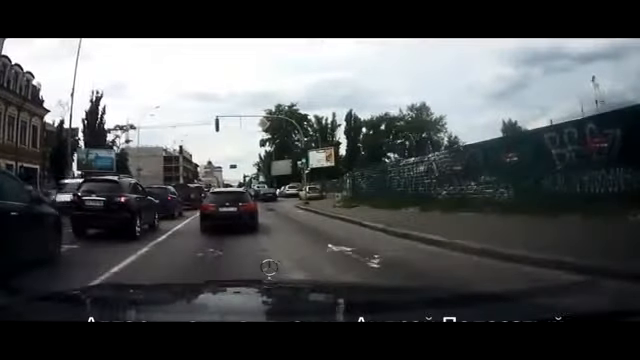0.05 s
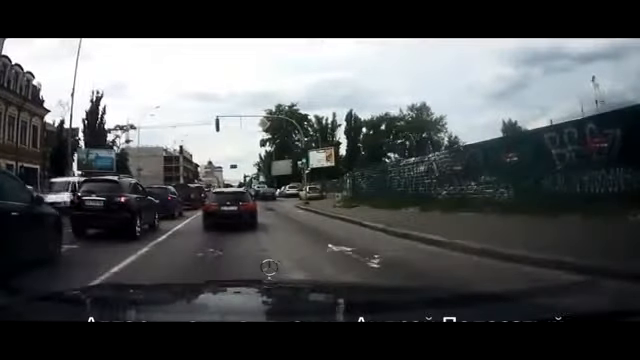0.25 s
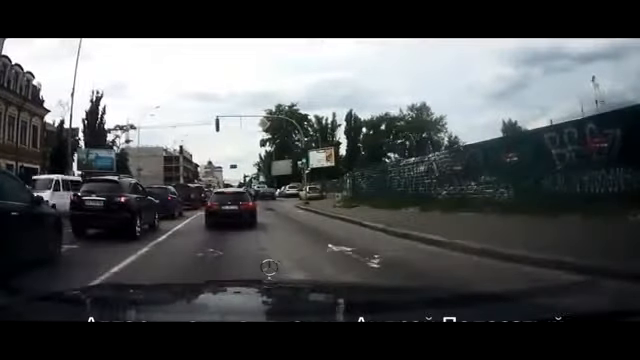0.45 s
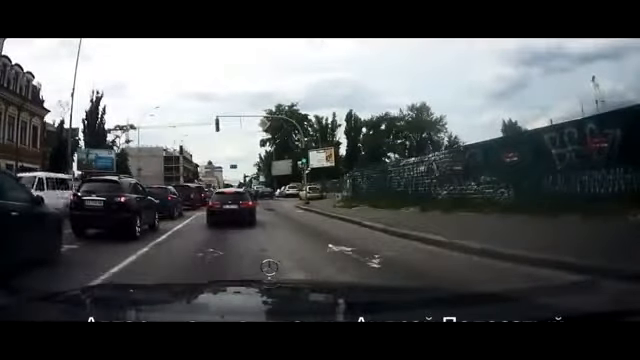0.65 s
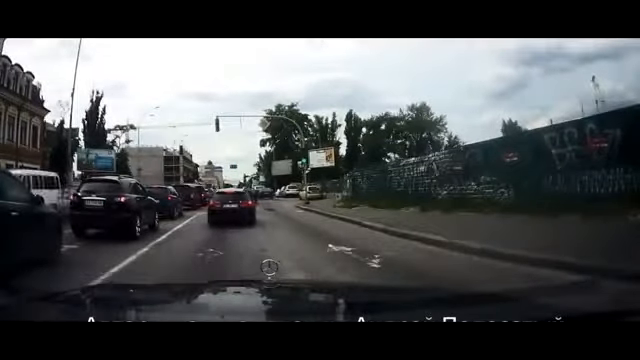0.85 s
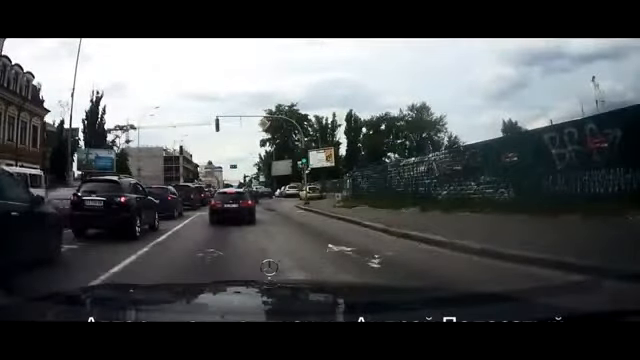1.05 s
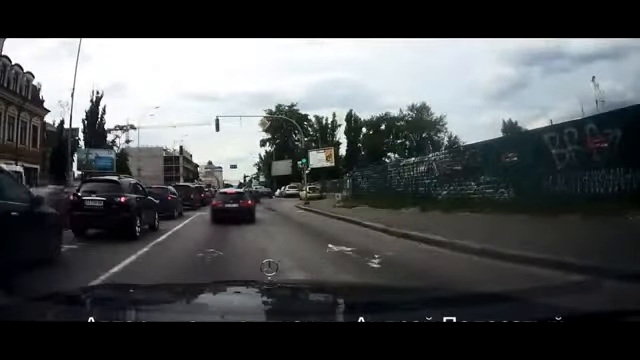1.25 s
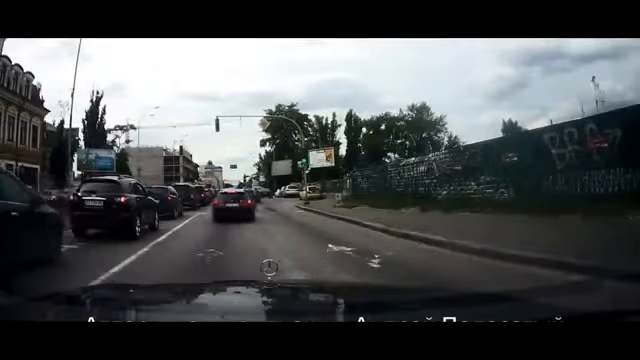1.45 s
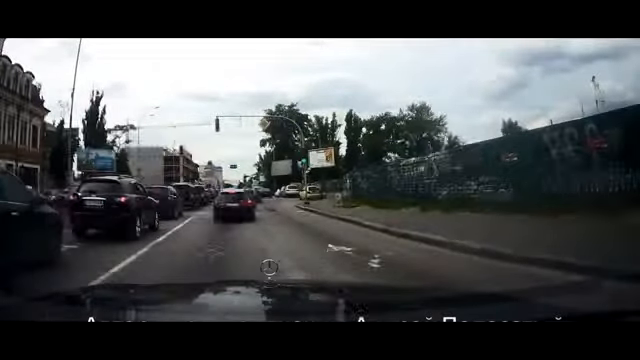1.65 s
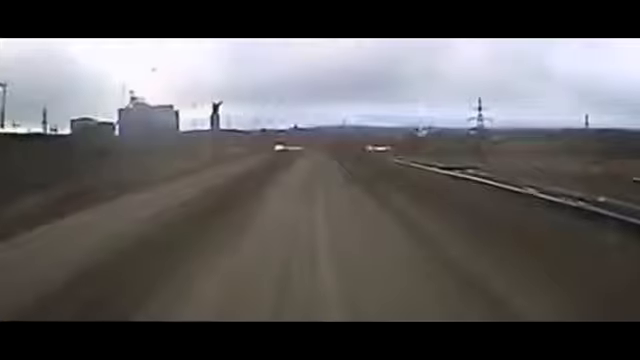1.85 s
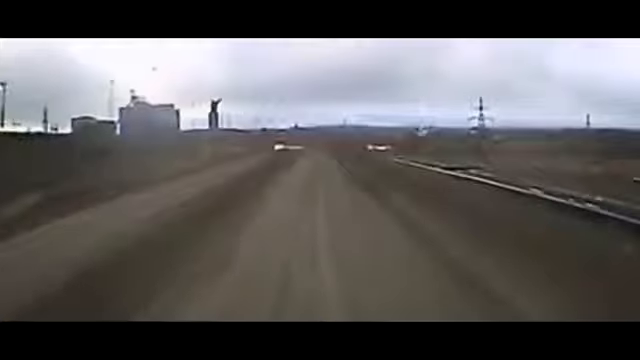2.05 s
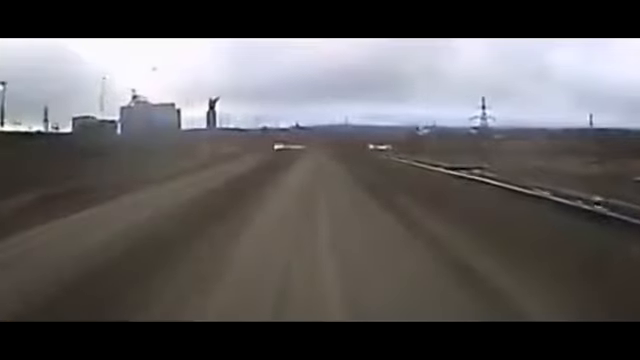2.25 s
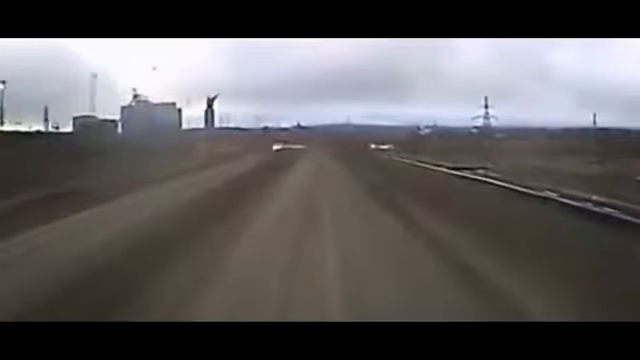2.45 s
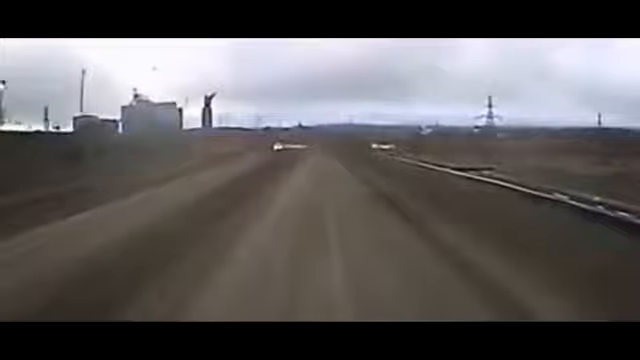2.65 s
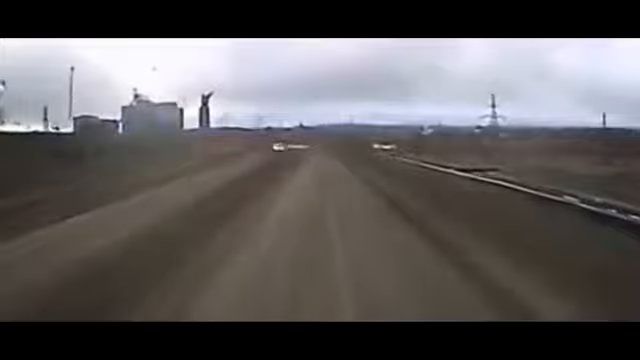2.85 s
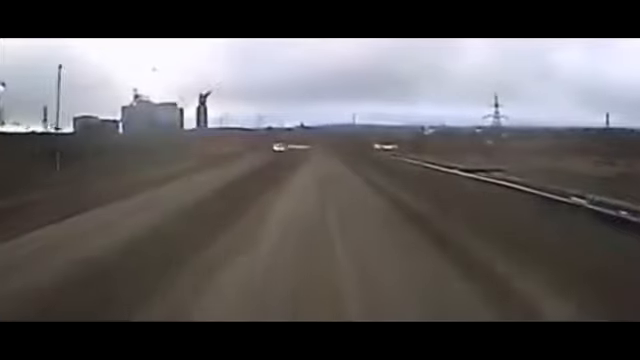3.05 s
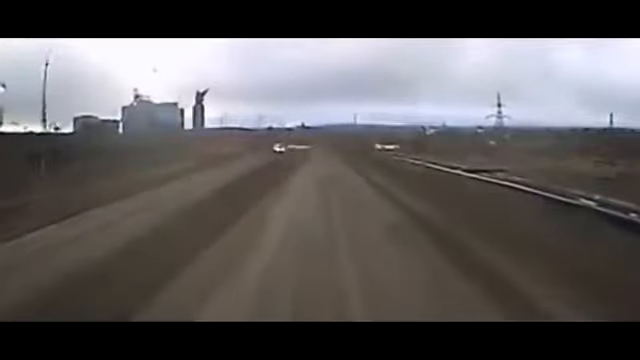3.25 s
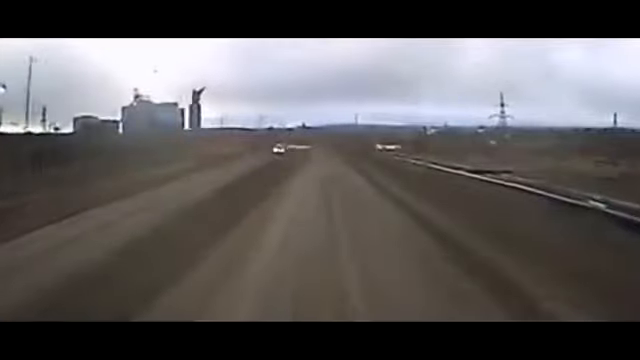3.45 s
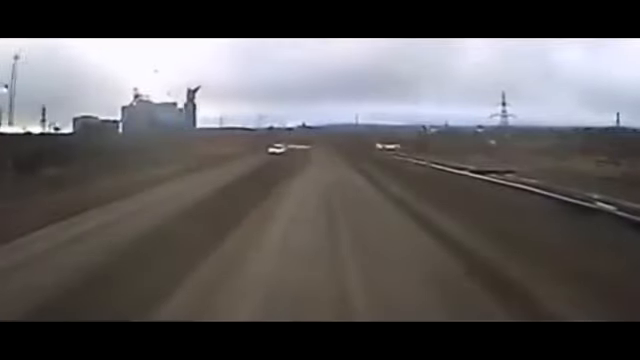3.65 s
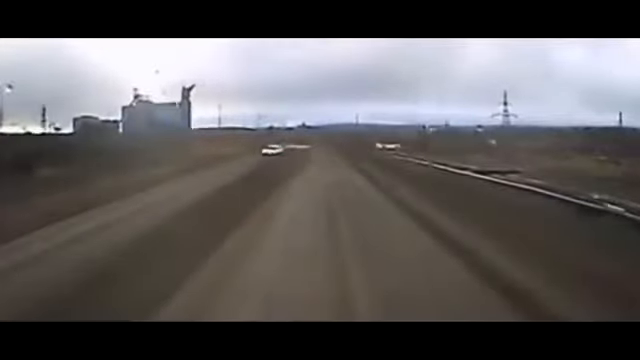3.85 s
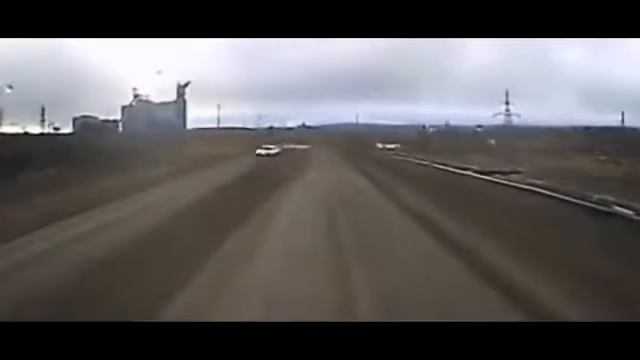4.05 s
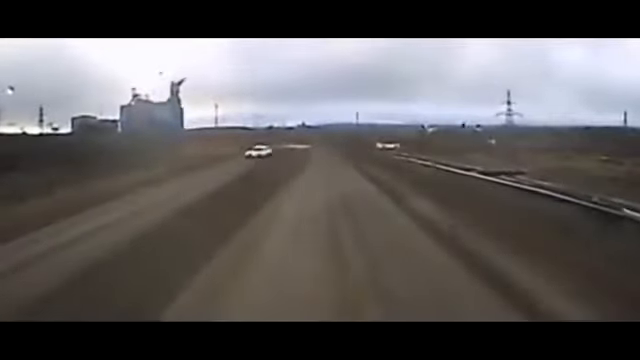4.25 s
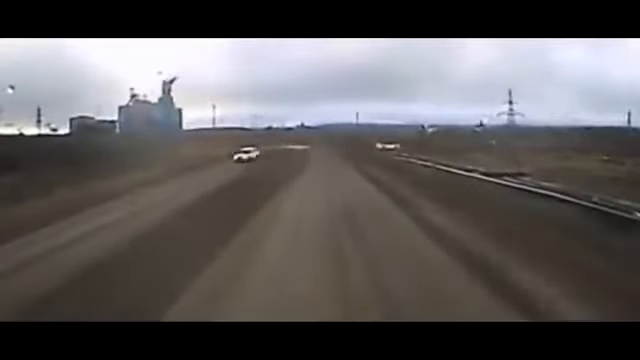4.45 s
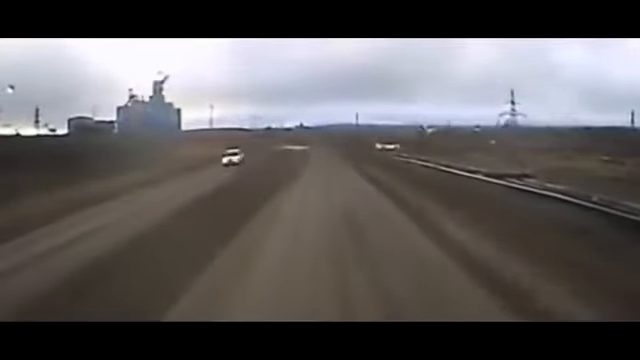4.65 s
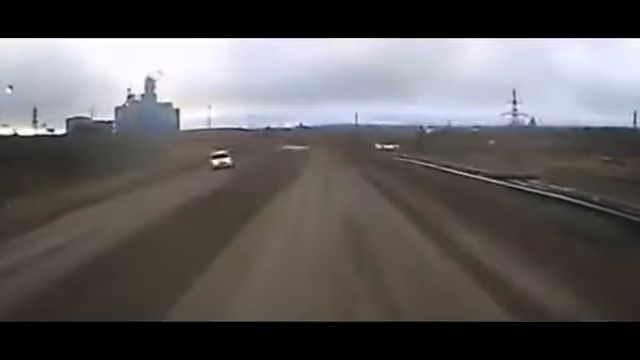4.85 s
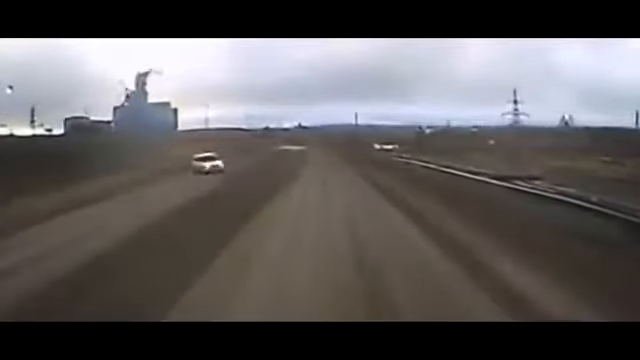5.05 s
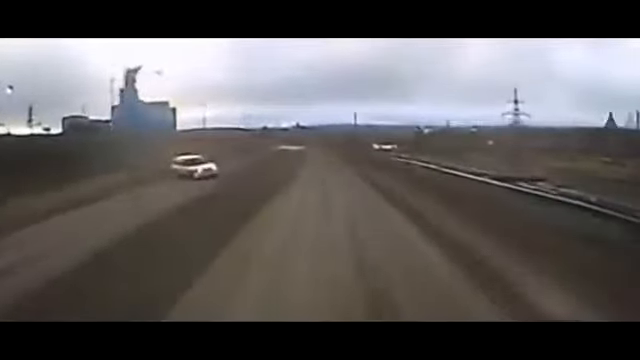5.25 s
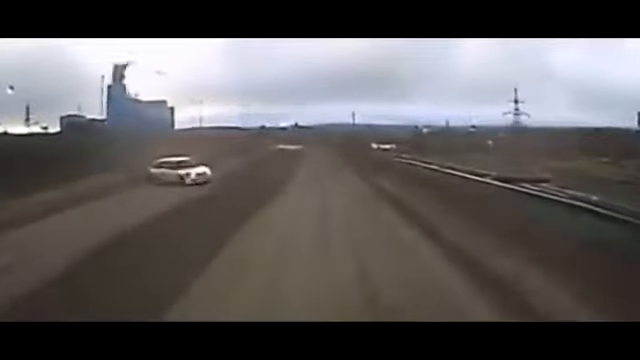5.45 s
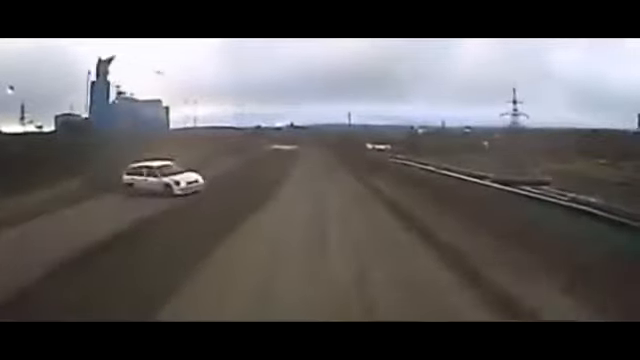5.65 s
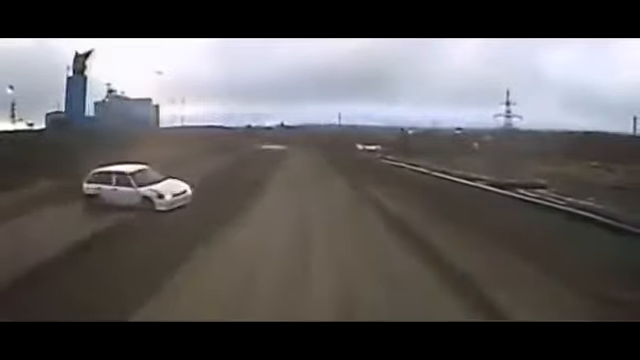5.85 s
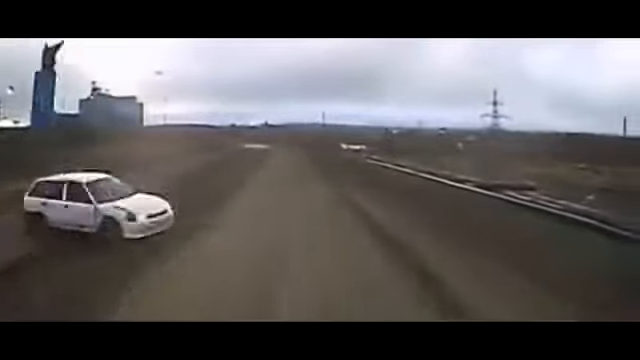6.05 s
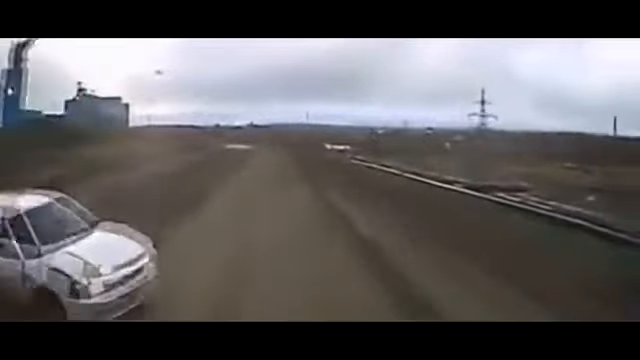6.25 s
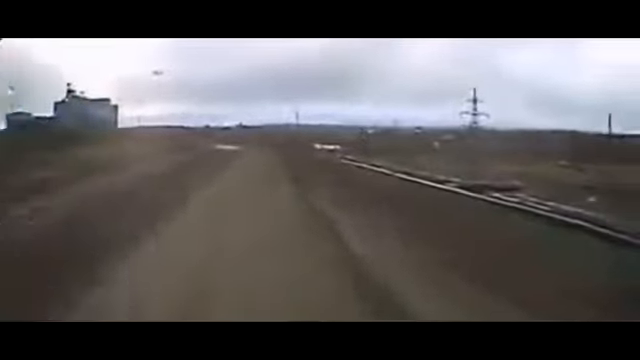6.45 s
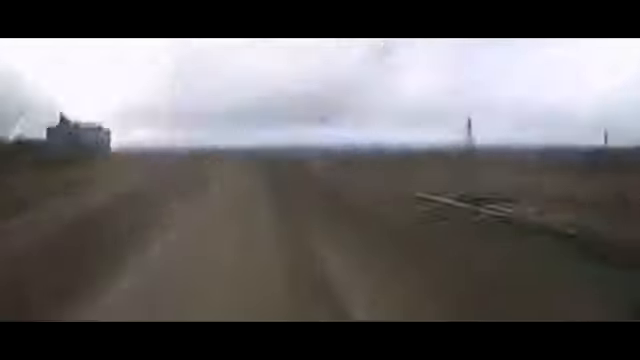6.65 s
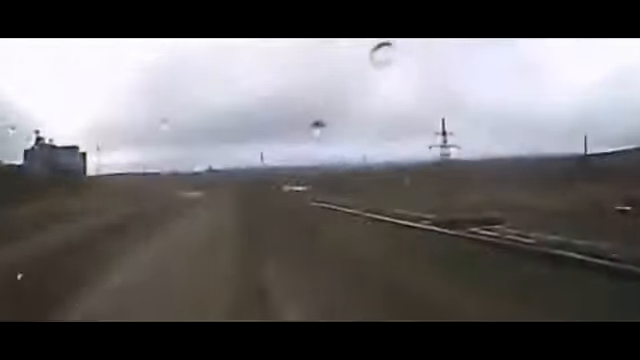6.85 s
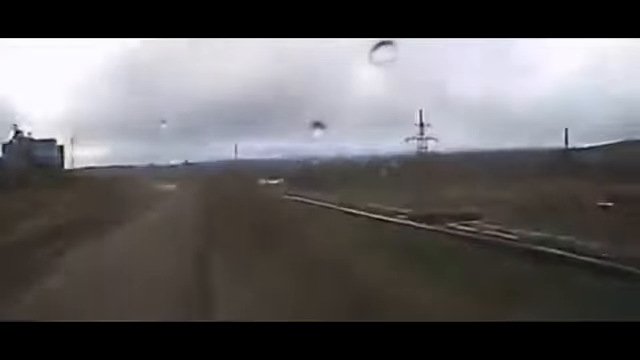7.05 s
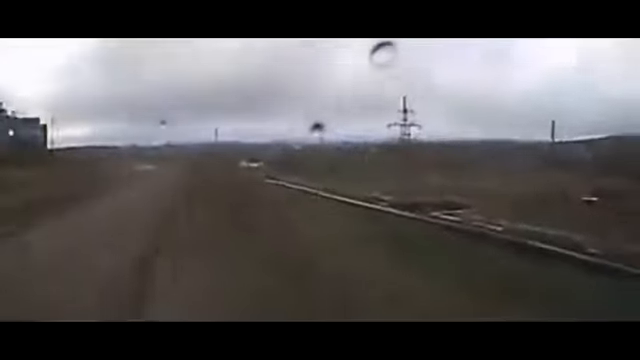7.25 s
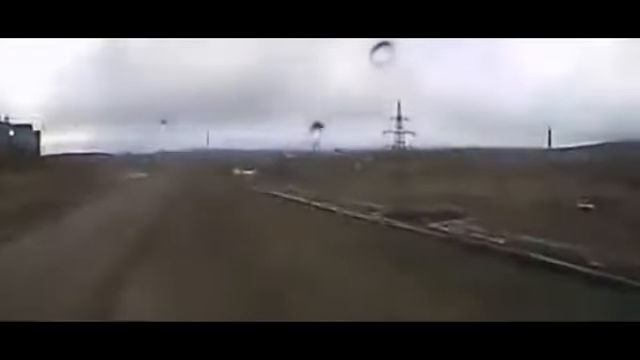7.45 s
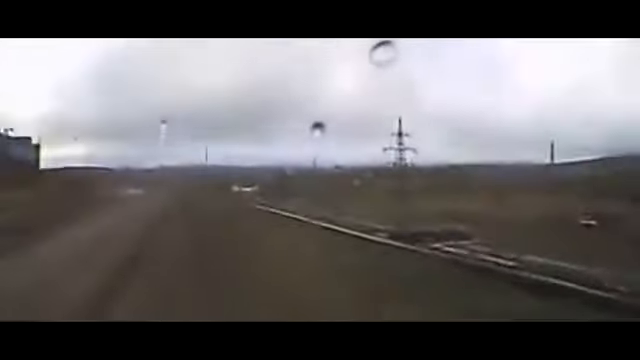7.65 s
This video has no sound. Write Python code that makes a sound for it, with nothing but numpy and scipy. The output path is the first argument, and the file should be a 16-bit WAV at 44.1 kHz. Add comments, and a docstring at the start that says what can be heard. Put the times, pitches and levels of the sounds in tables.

```python
"""A booming engine is heard first, from inside a car creeping through town: drifting tones over tyre noise.
Then a second car runs on a rough open road: tyre noise excites the cabin and a plastic mount chatters.
A crash follows: grains of crumpling metal, ringing panels and glass, then scraping, a squeal and grinding.
Impulses and noise drive resonators; friction is a wavering tone; a narrow-band microphone overloads."""
import sys
import numpy as np
from scipy import signal
from scipy.fft import rfft, irfft
from scipy.io import wavfile

SR = 44100
rng = np.random.default_rng(int(sys.argv[2]) if len(sys.argv) > 2 else 0)


def output_pcm(signal):
    """Save a mono or channel-first signal as 16-bit PCM at the path in sys.argv[1].

    Samples are clipped to [-1, 1] before scaling.
    """
    pcm = np.clip(np.atleast_2d(signal).T, -1, 1) * 32767
    wavfile.write(sys.argv[1], SR, np.round(pcm).astype(np.int16))


N = 339966
TIME = np.arange(N) / SR   # seconds

# blows on the body, from a pothole and from the crash:
# start_s, level_db, swell_ms, brightness_db_per_octave
BODY_BLOWS = [(5.13, -39, 22, 0), (6.141, -19, 4.3, 3), (6.168, -3.5, 6, -4), (6.19, -7, 5.1, -2.5),
              (6.216, -6, 8, 6), (6.243, -11, 8.5, 0), (6.276, -12, 4.9, -5), (6.348, -16, 7, -5),
              (6.405, -20, 17, 3.5), (6.831, -28, 5.1, 0), (6.935, -26, 16, 3.5), (7.621, -20.5, 13, -1)]
# resonances of the body panels: pitch_hz, width_hz, relative_level_db
PANEL_MODES = [(83, 60, -11.5), (239.5, 38, -5), (309.7, 21, 4.5), (462, 37, 2.5), (556, 30, 5),
               (723, 116, -4), (940, 125, -3), (1340, 530, -11.5)]
# spectrum of crumpling metal: frequency_hz, relative_density_db_per_hz
CRUSH_SPECTRUM = [(25, 9), (100, -4.5), (180, -2), (270, 4), (390, -1), (900, -2), (1800, 0), (2800, -6),
                  (4000, -5)]
# loose trim slapping against the car: start_s, level_db, swell_ms, brightness_db_per_octave
TRIM_SLAPS = [(6.622, -17, 2.8, 3), (6.755, -22.5, 19.7, -4), (6.829, -15, 3, 3), (6.841, -16.5, 6.5, -3.5),
              (6.858, -21, 8, -5), (6.891, -20.5, 4, -6), (7.01, -23, 11, -5), (7.074, -23, 3.3, 9),
              (7.127, -18, 3.9, 15), (7.141, -20.5, 4, 8), (7.2, -26, 6.5, -6), (7.297, -36, 4.6, -12),
              (7.5, -32.5, 13, -7), (7.622, -28, 13, -10)]
# resonances of the trim: pitch_hz, width_hz, relative_level_db
TRIM_MODES = [(1144, 435, 2.5), (1473, 130, 3), (1820, 145, 4), (2440, 380, -8.5)]
# plastic snaps as the body folds: start_s, relative_level_db
PLASTIC_SNAPS = [(6.312, 0), (6.362, -2), (6.387, 2), (6.516, -2), (6.843, -5)]
# spectrum of the wreck scraping along the road: frequency_hz, relative_density_db_per_hz
SCRAPE_SPECTRUM = [(35, -41), (60, -5), (500, -5), (1010, -4.5), (1820, -3.5), (3300, -19), (4000, -11.5)]
# knocks of the mount, from bumps and from the crash:
# start_s, relative_level_db, swell_ms, brightness_db_per_octave
MOUNT_KNOCKS = [(2.334, -28, 4.3, -1), (2.42, -31.5, 2.1, -3), (2.607, -25, 2.3, -1.5),
                (2.636, -24.5, 14.5, -3), (2.684, -24.5, 2.6, -1), (2.988, -28, 4.8, -2.5),
                (3.073, -29.5, 6, 3.5), (3.106, -24.5, 11.6, -2), (3.15, -23.5, 3.9, 0.5),
                (3.184, -28, 19, 1), (3.233, -25, 7.5, -2), (3.455, -25.5, 7, -1.5),
                (3.487, -25.5, 3.5, -0.5), (3.525, -27, 25, -2.5), (3.567, -23.5, 2.2, -0.5),
                (3.604, -26.5, 14.6, -3.5), (3.646, -26, 7.3, 0), (3.682, -25.5, 5, -1),
                (3.918, -35.5, 16, -4), (4.642, -33.5, 5.9, -2.5), (4.768, -25, 4.8, -1.5),
                (4.797, -31, 11, -2.5), (4.958, -27, 3.4, -1.5), (4.99, -29.5, 6.8, -2),
                (5.039, -26, 7.5, -1), (5.282, -26, 3.5, -1), (5.32, -28.5, 13.5, -2.5),
                (5.367, -25.5, 10.5, -0.5), (5.402, -32, 8.7, -2), (5.451, -30, 3.9, -1),
                (5.535, -30.5, 22, 0), (5.897, -28, 9.5, -2.5), (6.27, -8, 3.8, 2.5), (6.303, -9.5, 7.8, 1),
                (6.319, -12.5, 1.8, -1), (6.344, -4, 4, 2.5), (6.384, -10.5, 2.4, -2),
                (6.403, -10.5, 2.1, -5.5), (6.424, -17, 9.6, 5), (6.473, -14, 7.4, 3),
                (6.515, -17.5, 0.95, 1), (6.832, -24, 7.3, -3), (7.128, -25.5, 14.4, 1),
                (7.626, -23, 12.6, 2), (7.668, -28, 3.3, 0.5)]
# resonances of the plastic mount: pitch_hz, width_hz, relative_level_db
MOUNT_MODES = [(594, 460, -10.5), (1367, 270, -4.5), (1803, 69, 3.5), (1961, 104, 1), (2666, 390, -3.5),
               (3000, 200, -3), (3756, 380, -0.5)]
# short squeaks of rubbing parts: loudest_s, pitch_hz, level_db
RUBBING_SQUEAKS = [(2.094, 1380, -40), (4.38, 1386, -40.5), (6.56, 1084, -29), (6.968, 890, -25.5),
                   (7.047, 690, -28.5)]
# roughness of the open road, as the level of the mount's buzz: time_s, level_db
ROAD_ROUGHNESS = [(1.85, -47.5), (2.4, -47.5), (2.75, -45.5), (3.3, -42), (3.6, -46), (3.88, -49),
                  (4.55, -53.5), (4.9, -51.5), (5.2, -39.5), (5.55, -42), (6.1, -45)]
# spectrum of tyres on the open road: frequency_hz, relative_density_db_per_hz
ROAD_SPECTRUM = [(35, -43), (60, -17.5), (120, -7.5), (168, -14), (244, -5), (409, -12), (1730, -13),
                 (3160, -23.5), (3780, -21), (4200, -27.5)]
# cabin resonances (250, 327, 1740 Hz) and the second car's engine tones (587, 944, 1175 Hz, orders of about 117
# Hz), each as narrow-band noise: pitch_hz, width_hz, level_relative_to_tyres_db
CABIN_AND_ENGINE_LINES = [(250.6, 12.3, -9.5), (327, 44, -10.5), (587.4, 10, -19), (944, 18, -17.5), (1175, 12, -20.5),
                          (1740, 61, -20)]
# town engine: time_s, relative_firing_hum_db, relative_body_shudder_db
ENGINE_LEVELS = [(0.0, -32, -41.5), (0.876, -37, -36), (1.468, -35.5, -29.5), (1.8, -36.5, -37)]
# engine tones: pitch_hz, pitch_drift_hz, level_relative_to_hum_db
ENGINE_PARTIALS = [(42.7, 2.65, 1.5), (69, 4.66, -5.5), (118.5, 1.5, -13)]
# spectrum of tyres and traffic in town: frequency_hz, relative_density_db_per_hz
TOWN_SPECTRUM = [(79, -15), (135, -5), (253, -12), (310, -13), (610, -15.5), (700, -18), (1000, -14),
                 (1280, -20), (1550, -27), (3100, -42), (4030, -79), (6820, -120)]

ROAD_START_S = 1.805
IMPACT_S = 6.138
# the metal buckles at full force, then settles more quietly
BUCKLE_DB, BUCKLE_ATTACK_S, BUCKLE_HOLD_S, BUCKLE_FALL_DB_PER_S = -3, 0.017, 0.12, 653
SETTLE_DB, SETTLE_HOLD_S, SETTLE_FALL_DB_PER_S = -17, 0.29, 129
# the glass bursts, then showers down ever more thinly
BURST_DB, BURST_ATTACK_S, BURST_FALL_DB_PER_S = -12.5, 0.067, 138
SHOWER_DB, SHOWER_HOLD_S, SHOWER_FALL_DB_PER_S = -30.5, 0.73, 47
SHARDS_PER_S, SHARDS_THIN_S = 2100, 0.57   # rate at the impact; time constant of its decay
# the wreck slides on, scraping, over a steady rolling layer
SCRAPE_S, SCRAPE_DB, SCRAPE_ATTACK_S, SCRAPE_HOLD_S, SCRAPE_FALL_DB_PER_S = 6.315, -26, 0.49, 0.13, 51
ROLL_DB = -46
# one swing of air pressure in the cabin
PUSH_S, PUSH_DB, REBOUND_S, REBOUND_DB = 0.12, -8.5, 0.3, -17.5
# the skid squeal rises to its top pitch, then sags
SQUEAL_TOP_S, SQUEAL_HZ, SQUEAL_DB, SQUEAL_RISE_S, SQUEAL_HOLD_S = 6.652, 1870, -22.5, 0.03, 0.185
SQUEAL_RISE_HZ_PER_S, SQUEAL_SAG_HZ_PER_S, SQUEAL_FADE_DB_PER_S = 3500, 900, 14
# the grinding falls in pitch towards a low rest
GRIND_S, GRIND_HZ, GRIND_REST_HZ, GRIND_GLIDE_S = 6.832, 1517, 605, 0.16
GRIND_DB, GRIND_ATTACK_S, GRIND_HOLD_S, GRIND_FALL_DB_PER_S = -23.5, 0.01, 0.036, 57
# a faint whine swells and fades about its middle time while its pitch falls
WHINE_S, WHINE_HZ, WHINE_DB = 2.06, 1510, -40
WHINE_SAG_HZ_PER_S, WHINE_HALF_S, WHINE_FADE_DB = 520, 0.29, 14
TYRE_DB, TYRE_FOLLOWS = -40.5, 0.15   # on a road of mean roughness; share of the buzz's swing in dB
TOWN_DB = -40.5
# microphone: limits of the upward and downward swing, offset and lower rail, in units of full scale
OVERLOAD_UP, OVERLOAD_DOWN, OFFSET, RAIL = 0.6, 0.78, -0.11, 0.65
MIC_BAND_HZ, CUTOFF_HZ = 4040, 16200
FIZZ_DB, AIR_DB = -23.5, -28   # gains of the fizz and air bands


def from_db(db):
    """Amplitude gain is ten to the power of decibels over twenty."""
    return 10 ** (np.asarray(db) / 20)


def rms_one(x):
    """Dividing by the root mean square gives unit power."""
    return x / np.sqrt(np.mean(x ** 2) + 1e-20)


def in_time(rows):
    """Linear interpolation between rows gives one curve per column."""
    s, *columns = np.transpose(rows)
    return [np.interp(TIME, s, column) for column in columns]


def during(rows):
    """A gate of 1 from first to last row, with 5 ms ramps, avoids clicks."""
    to_nearest_end = np.minimum(TIME - rows[0][0], rows[-1][0] - TIME)
    return np.clip(to_nearest_end / 0.005, 0, 1)


def envelope(start_s, attack_s, hold_s, fall_db_per_s):
    """A gain rises linearly to 1, holds, then decays exponentially."""
    age = TIME - start_s
    falling_s = np.maximum(age - attack_s - hold_s, 0)
    return np.clip(age / attack_s, 0, 1) * from_db(-fall_db_per_s * falling_s)


def drift(rate):
    """Noise through a two-pole low-pass is a slow random curve with unit spread; rate in Hz."""
    step = 40   # samples between computed points
    r = np.exp(-2 * np.pi * step * rate / SR)
    noise = rng.standard_normal(N // step + 2002)
    slow = signal.lfilter([1], [1, -2 * r, r * r], noise)[2000:]   # drop the settling time
    return np.interp(np.arange(N) / step, np.arange(len(slow)), rms_one(slow))


def coloured(x, spectrum):
    """Filtering in the frequency domain shapes a steady excitation to a spectrum of unit power."""
    hz, db = np.transpose(spectrum)
    f = np.maximum(np.arange(N // 2 + 1) * SR / N, 1)
    gain = from_db(np.interp(np.log(f), np.log(hz), db))
    gain *= np.minimum(1, f / hz[0]) ** 2    # below the first row
    gain *= np.minimum(1, hz[-1] / f) ** 4   # above the last row
    return rms_one(irfft(rfft(x) * gain, N))


def resonate(x, hz, width):
    """A damped oscillator, as a two-pole filter, has unit gain at its resonance; width in Hz."""
    r = np.exp(-np.pi * width / SR)
    zeros = np.array([1, 0, -1]) * (1 - r * r) / 2
    poles = [1, -2 * r * np.cos(2 * np.pi * hz / SR), r * r]
    return signal.lfilter(zeros, poles, x + 1e-18)


def grains(per_s, spread_db):
    """Random impulses of uneven size and sign arrive independently at a mean rate."""
    sizes = from_db(spread_db * np.minimum(rng.exponential(1, N), 4))
    signs = rng.choice([-1, 1], N)
    return sizes * signs * (rng.random(N) < per_s / SR)


def contacts(rows, modes, decay_ms, spread_db, vary_db, tick_db):
    """Each contact is a tick within a swelling, dying burst of slips, exciting every mode by its own amount."""
    slips = rms_one(grains(9000, spread_db))
    strengths = from_db(vary_db * rng.uniform(-0.82, 1, (len(rows), len(modes))))
    age_ms = np.arange(SR // 6) * 1000 / SR
    force = np.zeros((len(modes), N))
    octaves = np.log2([hz for hz, width, db in modes])
    for (s, db, swell_ms, tilt_db), strength in zip(rows, strengths):
        start = int(s * SR)
        ms = age_ms[:N - start]
        stop = start + len(ms)
        swell = np.minimum(ms / swell_ms, 1) ** 0.5
        decay = np.exp(-np.maximum(ms - swell_ms, 0) / decay_ms)
        burst = slips[start:stop] * swell * decay
        burst[SR // 500] += from_db(tick_db) / np.sqrt(swell_ms)   # the tick, 2 ms in
        brightness = from_db(tilt_db * (octaves - octaves.mean()))
        force[:, start:stop] += np.outer(strength * brightness, from_db(db) * burst)
    power = sum(from_db(2 * db) * np.pi * width / SR for hz, width, db in modes)
    out = np.zeros(N)
    for k, (hz, width, db) in enumerate(modes):
        out += (-1) ** k * from_db(db) * resonate(force[k], hz, width)
    return out / np.sqrt(power)


def friction_tone(rows, waver, rough, smear_hz, flutter_db):
    """Stick and slip is a wavering tone; rough 0-1 is the power share smeared into narrow-band noise."""
    hz, db = in_time(rows)
    rough = np.clip(rough, 0, 1)
    phase = 2 * np.pi * np.cumsum(hz * (1 + waver * drift(64.9))) / SR
    smeared = (drift(smear_hz) * np.sin(phase) + drift(smear_hz) * np.cos(phase)) / np.sqrt(2)
    tone = np.sqrt(1 - rough) * np.sin(phase) + np.sqrt(rough) * smeared
    return during(rows) * from_db(db + flutter_db * drift(25)) * tone


def cabin_echoes(x, echo_db, t60):
    """Reflections from glass and dashboard are convolution with decaying noise; t60 in seconds."""
    age = np.arange(SR // 10) / SR
    tail = rng.standard_normal(len(age)) * from_db(-60 * age / t60) * (age > 0.002)
    return x + from_db(echo_db) * signal.fftconvolve(x, tail / np.linalg.norm(tail))[:N]


def collision():
    """Superposition joins impacts and scraping, reflected in the cabin, to pressure, rumble and friction."""
    blows = contacts(BODY_BLOWS, PANEL_MODES, decay_ms=22.0, spread_db=1.5, vary_db=2, tick_db=21)
    slaps = contacts(TRIM_SLAPS, TRIM_MODES, decay_ms=9.9, spread_db=0.5, vary_db=2.5, tick_db=17.5)
    reflected = cabin_echoes(crush() + blows + slaps + snaps() + scrape() + glass(), echo_db=-10, t60=0.075)
    return reflected + pressure_wave() + rumble() + skid() + grind()


def crush():
    """Buckling sheet metal is a dense train of cracks, whose force fluctuates at first and then settles."""
    buckle = from_db(BUCKLE_DB) * envelope(IMPACT_S, BUCKLE_ATTACK_S, BUCKLE_HOLD_S, BUCKLE_FALL_DB_PER_S)
    settle = from_db(SETTLE_DB) * envelope(IMPACT_S, BUCKLE_ATTACK_S, SETTLE_HOLD_S, SETTLE_FALL_DB_PER_S)
    cracks = coloured(grains(3000, 1.2), CRUSH_SPECTRUM)
    return cracks * (buckle * from_db(2.9 * drift(66)) + settle)


def pressure_wave():
    """Compressed cabin air makes one slow half-swing, then a longer, weaker rebound of opposite sign."""
    push = np.sin(np.pi * np.clip((TIME - IMPACT_S) / PUSH_S, 0, 1))
    rebound_age = np.clip((TIME - IMPACT_S - PUSH_S) / REBOUND_S, 0, 1)
    rebound = np.sin(np.pi * rebound_age ** 0.5)
    return from_db(REBOUND_DB) * rebound - from_db(PUSH_DB) * push


def glass():
    """Shards land as random impulses, each exciting one short resonance of its own pitch."""
    per_s = SHARDS_PER_S * np.exp(-np.maximum(TIME - IMPACT_S, 0) / SHARDS_THIN_S)
    clicks = grains(per_s, 2.4) / np.sqrt(np.maximum(per_s, 1))   # mean power stays even as they thin
    pitches = np.geomspace(1900, 4100, 20)
    dealt = rng.integers(0, len(pitches), N)
    rings = sum(resonate(clicks * (dealt == k), hz, width=190) for k, hz in enumerate(pitches))
    burst = from_db(BURST_DB) * envelope(IMPACT_S, BURST_ATTACK_S, 0, BURST_FALL_DB_PER_S)
    shower = from_db(SHOWER_DB) * envelope(IMPACT_S, BURST_ATTACK_S, SHOWER_HOLD_S, SHOWER_FALL_DB_PER_S)
    return rms_one(rings) * np.hypot(burst, shower)


def snaps():
    """The impulse response of the mount's plastic sounds at each single sharp click."""
    clicks = np.zeros(N)
    for s, db in PLASTIC_SNAPS:
        clicks[int(s * SR)] = from_db(db)
    ring = sum(from_db(db) * resonate(clicks, hz, width) for hz, width, db in MOUNT_MODES)
    ring = signal.sosfilt(signal.butter(4, MIC_BAND_HZ, fs=SR, output="sos"), ring)
    return -ring * clicks.max() / ring.max()


def scrape():
    """Sliding over asperities is a dense train of random impulses with a fluctuating level."""
    slide = from_db(SCRAPE_DB) * envelope(SCRAPE_S, SCRAPE_ATTACK_S, SCRAPE_HOLD_S, SCRAPE_FALL_DB_PER_S)
    rolling = from_db(ROLL_DB) * (TIME > SCRAPE_S)
    return coloured(grains(2200, 2.1), SCRAPE_SPECTRUM) * (slide + rolling) * from_db(1.6 * drift(40))


def rumble():
    """Noise through two equal resonances in series gives the low rumble of the sliding wreck."""
    once = resonate(rng.standard_normal(N), hz=85, width=76)
    twice = resonate(once, hz=85, width=76)
    return from_db(-46.5) * rms_one(twice) * (TIME > SCRAPE_S)


def skid():
    """Tyre friction squeals as a tone that rises quickly in pitch, then sags slowly as it fades."""
    start_hz = SQUEAL_HZ - SQUEAL_RISE_HZ_PER_S * SQUEAL_RISE_S
    end_hz = SQUEAL_HZ - SQUEAL_SAG_HZ_PER_S * SQUEAL_HOLD_S
    end_db = SQUEAL_DB - SQUEAL_FADE_DB_PER_S * SQUEAL_HOLD_S
    rows = [(SQUEAL_TOP_S - SQUEAL_RISE_S, start_hz, SQUEAL_DB),
            (SQUEAL_TOP_S, SQUEAL_HZ, SQUEAL_DB),
            (SQUEAL_TOP_S + SQUEAL_HOLD_S, end_hz, end_db)]
    return friction_tone(rows, waver=0.008, rough=0.2, smear_hz=90, flutter_db=1.5)


def grind():
    """Metal on the road is wholly rough friction: a juddering noise band that drops in pitch as it fades."""
    s = GRIND_S + np.linspace(0, 0.45, 16)
    hz = GRIND_REST_HZ + (GRIND_HZ - GRIND_REST_HZ) * np.exp(-(s - GRIND_S) / GRIND_GLIDE_S)
    rows = [(t, f, GRIND_DB) for t, f in zip(s, hz)]
    tone = friction_tone(rows, waver=0.06, rough=1, smear_hz=420, flutter_db=2.0)
    return tone * envelope(GRIND_S, GRIND_ATTACK_S, GRIND_HOLD_S, GRIND_FALL_DB_PER_S)


def mount_chatter():
    """Knocks excite the plastic mount's modes, and the cabin reflects them."""
    knocks = contacts(MOUNT_KNOCKS, MOUNT_MODES, decay_ms=9.2, spread_db=2.5, vary_db=3, tick_db=23)
    return cabin_echoes(from_db(0.63) * knocks, echo_db=-9.0, t60=0.15)


def squeaks():
    """Brief rubbing is a half-rough friction tone that swells, sags in pitch and fades in a tenth of a second."""
    out = np.zeros(N)
    for s, hz, db in RUBBING_SQUEAKS:
        rows = [(s - 0.05, hz * 1.2, db - 9), (s, hz, db), (s + 0.057, hz * 0.96, db - 12.0)]
        out += friction_tone(rows, waver=0.012, rough=0.55, smear_hz=90, flutter_db=3)
    return out


def whine():
    """A slightly rough tone falls steadily in pitch and is loudest halfway."""
    rows = [(WHINE_S + side * WHINE_HALF_S,
             WHINE_HZ - side * WHINE_HALF_S * WHINE_SAG_HZ_PER_S,
             WHINE_DB - abs(side) * WHINE_FADE_DB) for side in (-1, 0, 1)]
    return friction_tone(rows, waver=0.005, rough=0.16, smear_hz=60, flutter_db=1.5)


def mount_buzz():
    """Slips, modulated by the car's shaking, excite the mount's modes into a faint buzz of unit power."""
    shake = np.sin(2 * np.pi * np.cumsum(17.0 + 2.0 * drift(9.34)) / SR)
    slips = grains(3500, 2.3) * from_db(5.5 * shake + 3.3 * drift(18.0))
    return rms_one(sum((-1) ** k * from_db(db) * resonate(slips, hz, width)
                       for k, (hz, width, db) in enumerate(MOUNT_MODES)))


def open_road():
    """Broadband tyre noise on coarse asphalt joins the noise-driven cabin modes and engine tones, body sway,
    buzz and whine."""
    buzz_db, = in_time(ROAD_ROUGHNESS)
    tyre_db = TYRE_DB + TYRE_FOLLOWS * (buzz_db - buzz_db.mean())
    tyres = coloured(rng.standard_normal(N), ROAD_SPECTRUM) * from_db(-0.68 + 1.58 * drift(10.0))
    # the body rocks on its wheels
    sway = from_db(-1.0) * rms_one(resonate(rng.standard_normal(N), hz=25.8, width=12))
    cabin = sum(from_db(db + 3.1 * drift(5)) * rms_one(resonate(rng.standard_normal(N), hz, width))
                for hz, width, db in CABIN_AND_ENGINE_LINES)
    return from_db(tyre_db) * (tyres + sway + cabin) + from_db(buzz_db) * mount_buzz() + whine()


def town_car():
    """Drifting sinusoids form the engine hum and a low, uneven body shudder, above dull tyre noise."""
    hum_db, shudder_db = in_time(ENGINE_LEVELS)
    hum = sum(from_db(db + 2.6 * drift(8.5))
              * np.sin(2 * np.pi * np.cumsum(hz + width * drift(3.54)) / SR)
              for hz, width, db in ENGINE_PARTIALS)
    shudder_phase = 2 * np.pi * np.cumsum(31 + 2.36 * drift(4.93)) / SR
    shudder = from_db(2.9 * drift(7.8)) * np.sin(shudder_phase)
    tyres = coloured(rng.standard_normal(N), TOWN_SPECTRUM) * from_db(TOWN_DB + 0.36 * drift(16))
    engine = from_db(hum_db - 1.0) * hum + from_db(shudder_db - 0.5) * shudder
    return np.sqrt(2) * engine + tyres


def on_open_road():
    """A steep sigmoid weights the drives: 0 in town, 1 on the open road."""
    return 0.5 + 0.5 * np.tanh((TIME - ROAD_START_S) / 0.004)


def scene():
    """Complementary weights let the town drive give way abruptly to the open road."""
    second_drive = collision() + mount_chatter() + squeaks() + open_road()
    return np.array([town_car() * (1 - on_open_road()) + second_drive * on_open_road()])


def record(dry):
    """On the open road the microphone saturates unequally up and down, and passes a narrow band."""
    driven = dry + OFFSET
    limit = np.where(driven > 0, OVERLOAD_UP, OVERLOAD_DOWN)
    overloaded = driven / (1 + (driven / limit) ** 12) ** (1 / 12)
    band = signal.firwin(301, MIC_BAND_HZ, window=("kaiser", 8), fs=SR)
    narrow = signal.fftconvolve(overloaded, band[None], "same")
    # a faint fizz above the band and thinner air higher up, made here by rectifying the signal
    rectified = np.abs(narrow - OFFSET)
    fizz = signal.sosfilt(signal.butter(2, [6500, 8000], "band", fs=SR, output="sos"), rectified)
    air = signal.sosfilt(signal.butter(2, [10500, 14500], "band", fs=SR, output="sos"), rectified)
    # the lower rail cuts off downward overshoots, with smoothed edges
    cut_off_tips = np.maximum(-RAIL - narrow, 0)
    rail_correction = signal.sosfilt(signal.butter(1, 9000, fs=SR, output="sos"), cut_off_tips)
    railed = narrow + from_db(FIZZ_DB) * fizz + from_db(AIR_DB) * air + rail_correction
    out = dry + on_open_road() * (railed - dry)
    return signal.sosfilt(signal.cheby2(12, 70, CUTOFF_HZ, fs=SR, output="sos"), out)


dry = scene()
out = record(dry)
output_pcm(out)
```